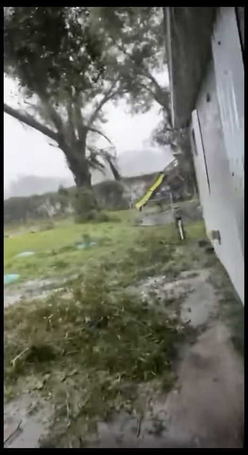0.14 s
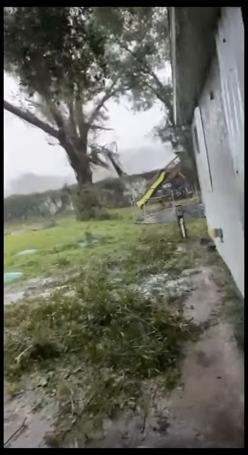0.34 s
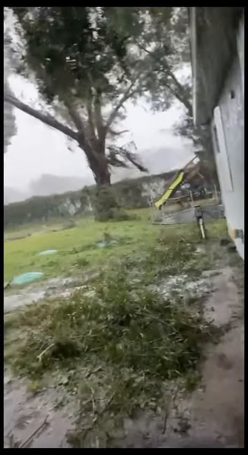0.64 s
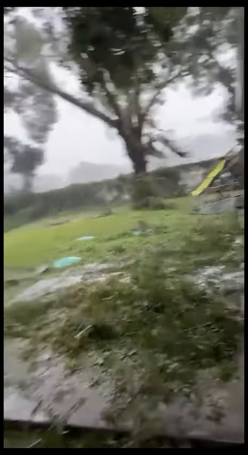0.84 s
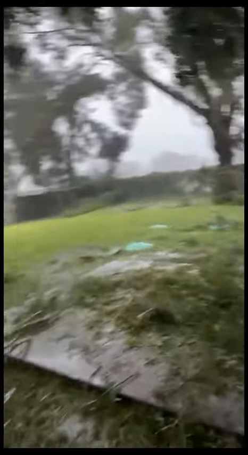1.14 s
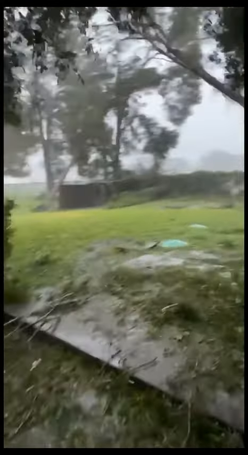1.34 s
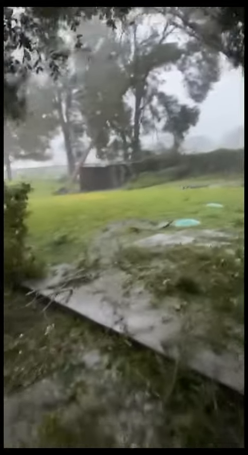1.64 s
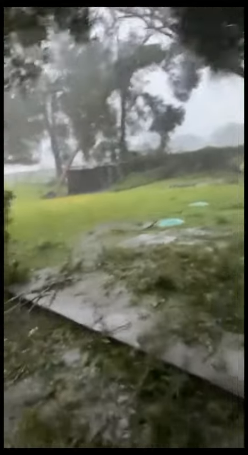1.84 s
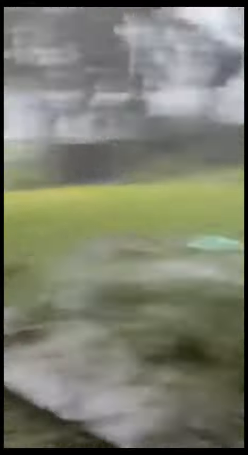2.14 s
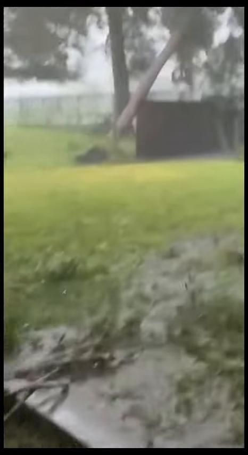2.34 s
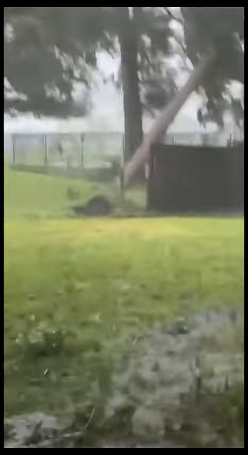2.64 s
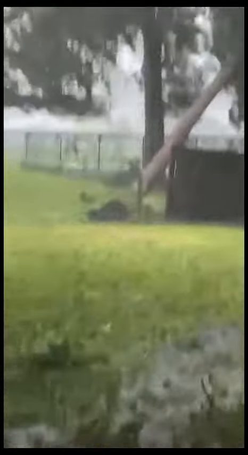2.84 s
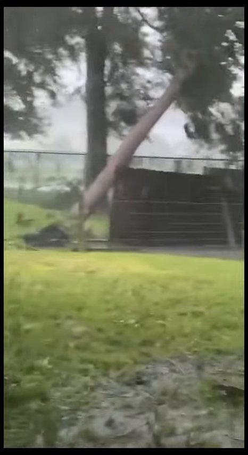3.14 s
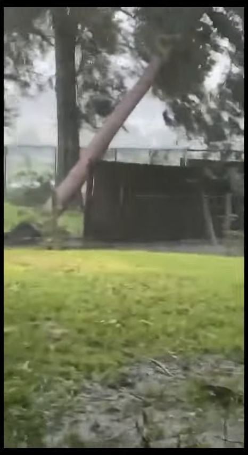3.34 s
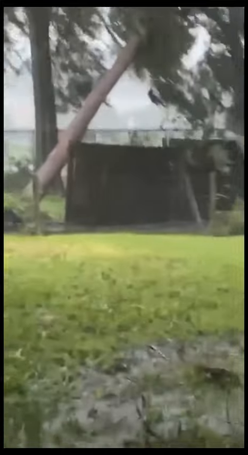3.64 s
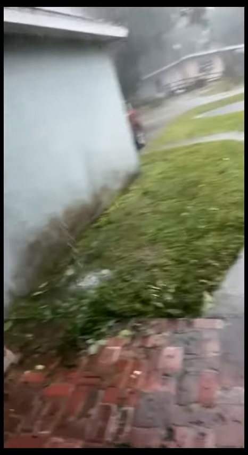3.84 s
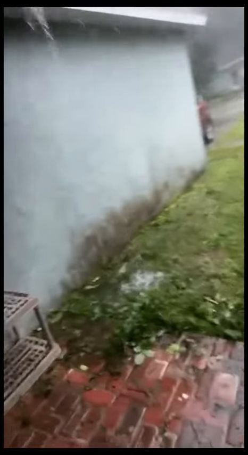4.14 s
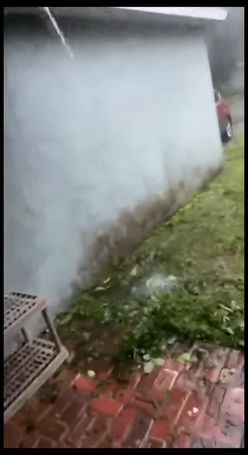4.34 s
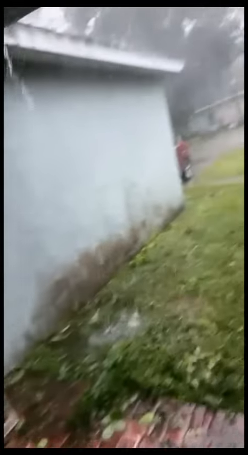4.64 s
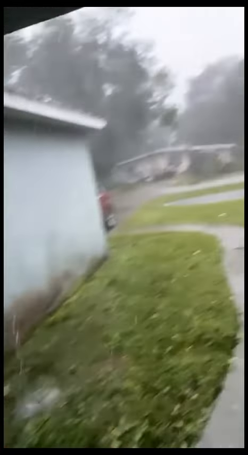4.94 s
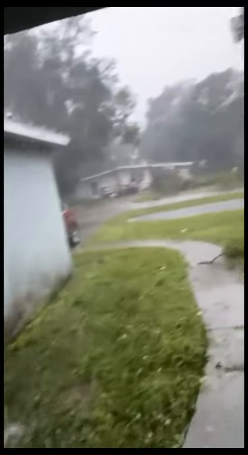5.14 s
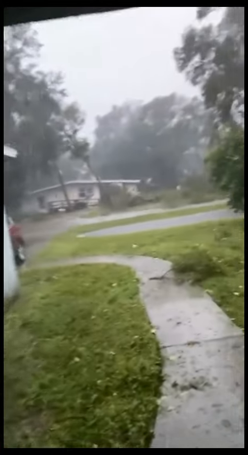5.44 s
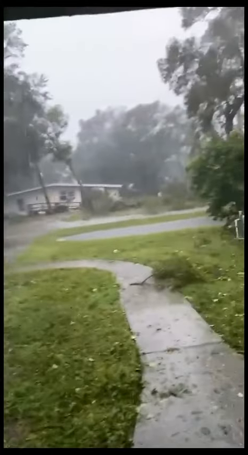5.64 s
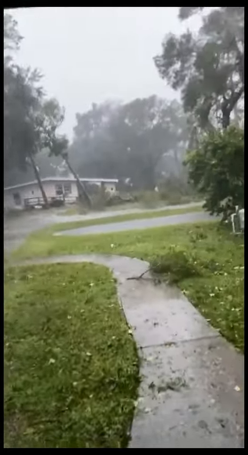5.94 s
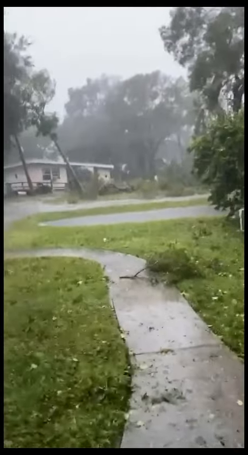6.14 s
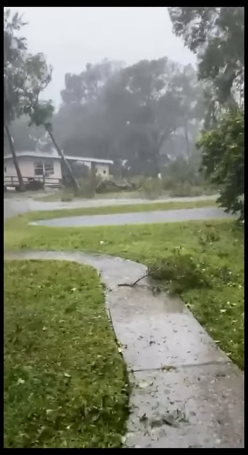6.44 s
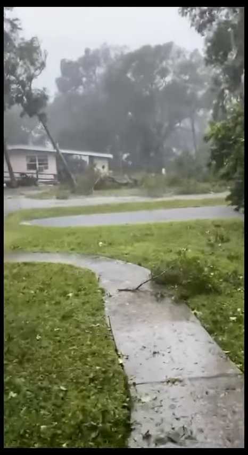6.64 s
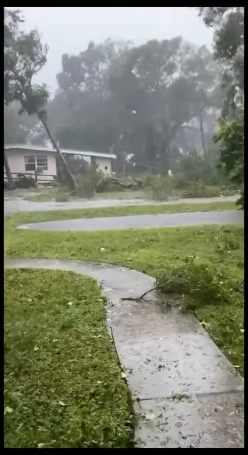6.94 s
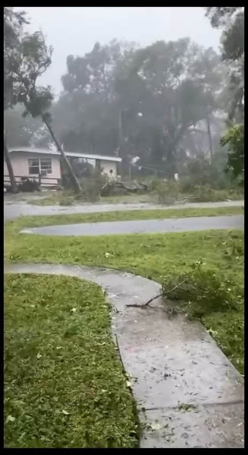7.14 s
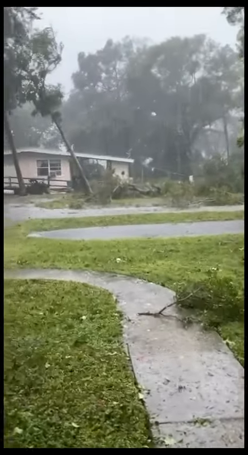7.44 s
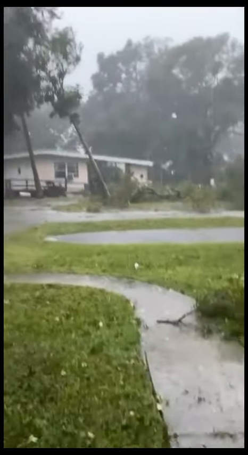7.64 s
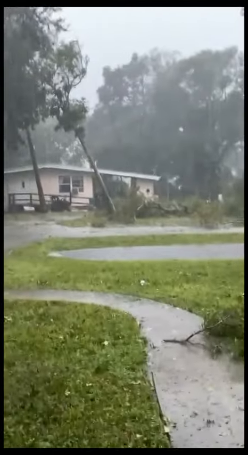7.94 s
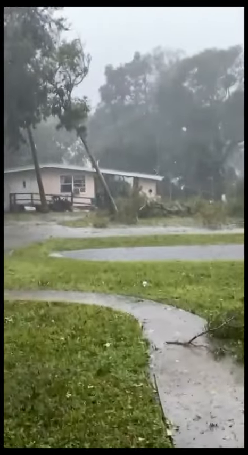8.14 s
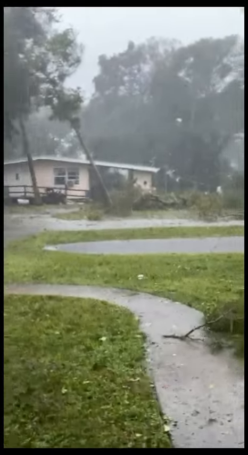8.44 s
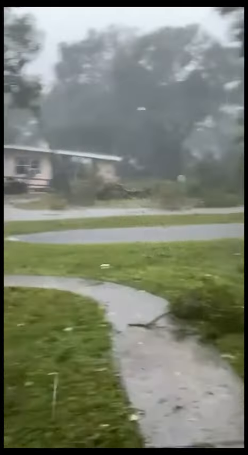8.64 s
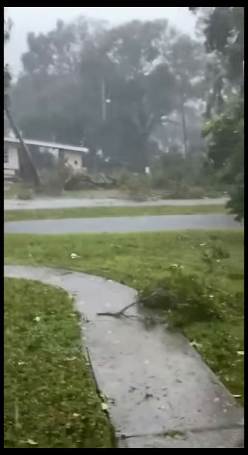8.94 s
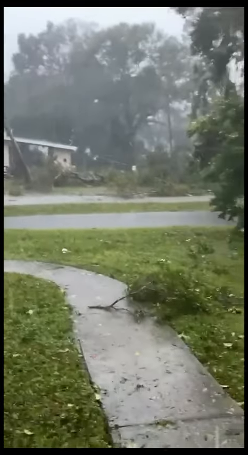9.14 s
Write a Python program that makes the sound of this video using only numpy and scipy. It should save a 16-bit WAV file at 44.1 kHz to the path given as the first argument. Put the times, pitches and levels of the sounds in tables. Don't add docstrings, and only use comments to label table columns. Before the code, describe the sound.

Loud gusty rain with sharp drops and deep wind buffeting cuts to silence, then softer rain swells with wet drips and splats.

```python
import sys
import numpy as np
from scipy import signal
from scipy.io import wavfile
from scipy.ndimage import uniform_filter1d

SR = 44100
rng = np.random.default_rng(int(sys.argv[2]) if len(sys.argv) > 2 else 0)


def ratio_of_db(decibels):
    return 10 ** (np.asarray(decibels, float) / 20)


def bounce(signal):
    frames = np.transpose(np.atleast_2d(signal))
    limited = np.clip(frames, -1, 1)
    pcm = np.round(limited * 32767).astype(np.int16)
    wavfile.write(sys.argv[1], SR, pcm)


N = 409688

# (start [s], end [s])
SILENCE = (3.7205, 4.0425)

# (frequency [Hz], level per Hz [dB])
RAIN_BACK = [(82, -31.5), (140, -1.5), (213, -2), (245, -2), (544, -5.5), (1950, -9), (3030, -13),
             (3770, -11), (5620, -15.5), (8040, -13.5), (12700, -22.5), (14900, -14), (16500, -42)]
# (frequency [Hz], level per Hz [dB])
RAIN_FRONT = [(82, -21), (140, -3.5), (255, -1), (317, 1.5), (523, -5.5), (827, -2), (2330, -6.5),
              (4330, -4.5), (5080, -7.5), (8540, -8.5), (12700, -20.5), (15200, -9), (16500, -46)]
# (time [s], level [dB])
RAIN_LEVEL = [(0.0, -29.5), (0.56, -25.5), (1.15, -27), (1.42, -25), (1.64, -26.5), (2.3, -25.5),
              (2.46, -33), (2.68, -28), (3.1, -29), (3.42, -28), (3.7, -26), (4.04, -45), (4.5, -39),
              (4.95, -35), (5.6, -33), (6.6, -30), (7.9, -26.5), (9.29, -26)]


def rain():
    t = np.arange(N) / SR
    back = t < SILENCE[1]
    hiss = field(by_shot(RAIN_BACK, RAIN_FRONT), 512, patchy_db=1.08, flicker_db=0.39)
    back_gain = ratio_of_db(3.5) / hiss[back].std()
    front_gain = ratio_of_db(2) / hiss[~back].std()
    hiss = hiss * np.where(back, back_gain, front_gain)
    clicks = ratio_of_db(-10.5) * yard(patter(400, 3.2, 2.1, 900, 15200), 0.26)
    splashes = ratio_of_db(-15) * yard(patter(320, 2.0, 1.2, 1500, 11000), 2.6)
    sheets = lumpy(round(0.014 * SR))
    level = ratio_of_db(np.interp(t, *np.transpose(RAIN_LEVEL)) + 0.65 * sheets)
    return level * spray_gain(t) * (0.92 * hiss + np.where(back, clicks, splashes))


def patter(per_s, spread_db, cycles, low_hz, high_hz):
    kinds = 24
    size_db = spread_db * np.minimum(rng.exponential(1, N), 3.5)
    size = ratio_of_db(size_db) * (rng.random(N) < per_s / SR)
    kind = rng.integers(0, kinds, N)
    t = np.arange(600) / SR
    out = np.zeros(N)
    for k, hz in enumerate(np.geomspace(low_hz, high_hz, kinds)):
        grain = np.sin(2 * np.pi * hz * t) * np.exp(-t * hz / cycles)
        grain *= ratio_of_db(read(RAIN_FRONT, hz)) * hz ** 1.56
        out += signal.oaconvolve(size * (kind == k), grain)[:N]
    return evened(out)


# (start [s], hold [s], level against the rain [dB])
SPRAY = [(0.3, 0.027, -11), (1.3, 0.027, -6), (1.41, 0.015, -8), (1.48, 0.02, -5), (2.66, 0.021, -5),
         (2.79, 0.02, -3), (3.46, 0.036, -3.5), (3.63, 0.075, -5), (4.07, 0.017, -8), (4.16, 0.02, -12),
         (4.2, 0.026, -1), (4.37, 0.016, 1), (4.69, 0.054, -4), (4.89, 0.02, -5), (5.33, 0.02, -7),
         (5.545, 0.02, -14), (5.92, 0.025, -0.5), (6.0, 0.037, -0.5), (6.26, 0.018, -2.5), (6.41, 0.02, -9),
         (6.98, 0.03, -8), (8.05, 0.03, -7), (8.94, 0.018, -7), (9.04, 0.027, -5), (9.27, 0.02, -5)]


def spray_gain(t):
    coarse = t[::32]
    spray_db = pushes_db(SPRAY, 1500.5, 297, coarse)
    return np.interp(t, coarse, np.hypot(1, ratio_of_db(spray_db)))


# (time [s], peak level [dB], centre [Hz])
TICKS_BACK = [(0.2952, -5, 8800), (0.3254, -10, 6500), (0.3638, -8, 7830), (0.4565, -16, 7820),
              (0.9674, -1, 7830), (0.9948, -10, 7570), (1.0347, -2.5, 8160), (1.2974, -7, 6500),
              (1.344, -9, 4340), (1.4019, -7, 7680), (1.4638, -16, 3620), (1.59, -11, 3640),
              (1.6433, -11, 7030), (1.8778, -18, 5960), (1.9571, -22, 3840), (2.018, -7, 3970),
              (2.1652, -10, 4170), (2.243, -17, 4650), (2.2729, -10, 4450), (2.3802, -3.5, 8600),
              (2.6501, -10, 6360), (2.669, -11, 4080), (2.7897, -14, 4500), (3.0202, -9, 6120),
              (3.1035, -9, 9750), (3.4507, -9, 4250), (3.4852, -12, 3700), (3.568, -16.5, 8240),
              (3.6318, -9, 5420)]
# (time [s], peak level [dB], centre [Hz])
TICKS_FRONT = [(4.9519, -26, 3200), (5.2856, -22, 6010), (5.3575, -22, 7500), (5.5076, -24, 3280),
               (5.5406, -20, 3940), (5.5889, -22, 3200), (5.6633, -21, 3230), (5.771, -22, 5880),
               (5.8045, -23, 6430), (5.925, -17, 4700), (6.2544, -18, 3800), (6.3984, -15.5, 3450),
               (6.5844, -18.5, 3840), (6.8678, -19, 3500), (6.979, -20, 3450), (7.2404, -20, 4300),
               (7.3916, -24, 5520), (7.5113, -21, 4280), (7.592, -25, 3540), (7.8431, -21, 4800),
               (7.9114, -20, 4260), (8.0426, -17.5, 4500), (8.16, -19, 4300), (8.5135, -16, 4080),
               (8.6062, -15, 4590), (8.6338, -16, 3720), (8.7325, -17, 4050), (9.0104, -22, 3530),
               (9.1536, -26, 4900), (9.2387, -19, 6600)]
# (time [s], peak level [dB], centre [Hz])
SPLATS_BACK = [
    (0.6524, -12, 1990),
    (0.9652, -6.5, 1750),
    (0.9951, -14.5, 2200),
    (1.3438, -9, 1650),
    (1.3957, -7.5, 2230),
    (1.4202, -8, 1530),
]
# (time [s], peak level [dB], centre [Hz])
SPLATS_FRONT = [(4.476, -33, 1950), (4.819, -27, 2320), (4.865, -32, 820), (5.054, -30, 1020),
                (5.097, -26, 1690), (5.317, -22, 1870), (5.376, -26, 2500), (5.543, -20, 1770),
                (5.589, -27, 2030), (5.664, -27, 1750), (5.769, -24, 1740), (6.672, -23, 2610),
                (6.939, -23, 1400), (7.161, -16.5, 2030), (7.33, -20, 1800), (7.69, -20, 1520),
                (7.843, -15, 2480), (7.984, -19, 870), (8.159, -16.5, 2420), (8.287, -20, 2620),
                (8.353, -17, 2640), (8.51, -19, 1820), (8.648, -21.5, 1800), (8.749, -27, 961),
                (9.038, -19, 2050), (9.154, -21, 1100)]
# (time [s], peak level [dB], centre [Hz])
BIG_DROPS = [
    (5.541, -19, 2500),
    (5.542, -19, 7500),
    (5.923, -7.5, 6500),
    (9.03, -10.5, 975),
]
# (time [s], peak level [dB], centre [Hz])
PLINKS = [
    (0.5297, -19, 5300),
    (1.418, -16.5, 440),
    (3.568, -16, 8240),
    (7.32, -18, 2480),
    (7.325, -21, 3600),
    (7.986, -23, 900),
    (9.031, -16.5, 970),
]


def near_drops():
    kinds = [  # rows, splash t60 [s], sharpness = centre / width
        (TICKS_BACK, 0.035, 1.3), (TICKS_FRONT, 0.089, 2.0), (SPLATS_BACK, 0.022, 1.5),
        (SPLATS_FRONT, 0.093, 2.4), (BIG_DROPS, 0.041, 2.2), (PLINKS, 0.046, 5.1)]
    out = np.zeros(N)
    for rows, t60, sharpness in kinds:
        for s, db, hz in rows:
            add(out, s, ratio_of_db(db) * splash(hz, t60, sharpness))
    return yard(out, 0.21)


def splash(hz, t60, sharpness):
    t = np.arange(6000) / SR
    out = 2.2 * t60 * rng.standard_normal(len(t)) * ratio_of_db(-60 * t / t60)
    out[0] = 1
    r = np.exp(-np.pi * hz / sharpness / SR)
    poles = [1, -2 * r * np.cos(2 * np.pi * hz / SR), r * r]
    for zeros in ([1, 0, -1], [1]):
        out = signal.lfilter(zeros, poles, out)
    return out / abs(out).max()


def wind():
    return rumble() + eddies() + slaps()


# (frequency [Hz], level per Hz [dB])
RUMBLE_BACK = [(15, -37.5), (25, -18.5), (48, 3.5), (70, 6.5), (115, 1), (167, -9.5), (220, -12.5),
               (290, -46.5), (480, -120)]
# (frequency [Hz], level per Hz [dB])
RUMBLE_FRONT = [(15, -44.5), (25, -17), (49, 2), (75, 2), (102, 2), (145, -9), (220, -9.5), (290, -37),
                (480, -120)]
# (start [s], hold [s], level [dB])
BUFFETS_BACK = [(0.0, 0.1, -32.5), (0.29, 0.04, -29.5), (0.42, 0.068, -29.5), (1.05, 0.1, -33),
                (1.3, 0.011, -29), (1.45, 0.01, -31), (1.63, 0.0077, -17.5), (1.77, 0.13, -12),
                (1.98, 0.46, -12.5), (2.56, 0.28, -28), (2.6, 0.03, -18), (2.68, 0.01, -20),
                (2.81, 0.01, -14.5), (2.91, 0.03, -21.5), (3.0, 0.075, -26), (3.36, 0.022, -24),
                (3.49, 0.01, -30), (3.66, 0.036, -25.5)]
# (start [s], hold [s], level [dB])
BUFFETS_FRONT = [(4.23, 0.11, -45), (4.37, 0.01, -44), (4.51, 0.02, -40), (4.63, 0.021, -37),
                 (4.8, 0.06, -38), (5.3, 0.01, -46), (5.48, 0.03, -32.5), (5.58, 0.01, -41),
                 (5.75, 0.049, -44), (5.91, 0.14, -33.5), (6.19, 0.02, -44), (6.29, 0.04, -37),
                 (6.58, 0.1, -42), (6.99, 0.67, -34), (7.96, 0.11, -32), (8.6, 0.01, -30),
                 (8.75, 0.02, -27), (8.88, 0.036, -28), (8.98, 0.03, -31), (9.25, 0.009, -24)]


def rumble():
    t = np.arange(N) / SR
    coarse = t[::32]
    noise = evened(field(by_shot(RUMBLE_BACK, RUMBLE_FRONT), 2048, patchy_db=-0.5, flicker_db=0.3))
    noise /= uniform_filter1d(noise ** 2, size=2500) ** 0.24
    buffet_db = pushes_db([*BUFFETS_BACK, *BUFFETS_FRONT], 261, 329.5, coarse)
    breeze_db = np.interp(coarse, *np.transpose(RAIN_LEVEL)) - 6
    push = np.hypot(ratio_of_db(buffet_db), ratio_of_db(breeze_db))
    return noise * ratio_of_db(0.97) * np.interp(t, coarse, push)


# (start [s], hold [s], level [dB])
EDDIES = [(1.419, 0.004, -25), (1.55, 0.2, -34), (1.76, 0.07, -10.5), (1.87, 0.0026, -7),
          (1.956, 0.028, -18.5), (2.036, 0.0045, -2.5), (2.06, 0.036, -10), (2.1, 0.037, -6.5),
          (2.216, 0.003, -7), (2.26, 0.041, -9), (2.3, 0.068, -6), (2.37, 0.061, -7), (2.6, 0.015, -24),
          (2.64, 0.026, -32), (2.73, 0.014, -19.5), (2.77, 0.23, -30)]


def eddies():
    t = np.arange(N) / SR
    coarse = t[::32]
    eddy_db = pushes_db(EDDIES, 898, 598, coarse)

    def band(hz, s):
        speed_db = np.maximum(np.interp(s, coarse, eddy_db), -50)
        top_hz = 393 * ratio_of_db(0.21 * (speed_db + 5))
        slopes = (1 + (hz / top_hz) ** 4.57) * (1 + (110 / (hz + 1)) ** 4)
        return -12.0 * np.log10(slopes) - 8.0 * np.log10(top_hz / 400)

    out = field(band, 512, patchy_db=1.0, flicker_db=1.1) * ratio_of_db(2.4 * lumpy(500))
    out /= np.sqrt(uniform_filter1d(out ** 2, size=1500))
    return out * ratio_of_db(np.interp(t, coarse, eddy_db) - 0.4)


# (time [s], peak level [dB], top [Hz])
SLAPS = [(0.965, 0, 865), (1.418, -12, 590), (1.751, -3, 420), (2.031, 1, 1040), (2.211, -7, 413),
         (2.311, -2, 470), (2.676, -4.5, 114), (2.733, -7, 344), (2.8, -18, 120), (8.583, -19, 120),
         (8.684, -10.5, 112), (8.868, -14, 190), (8.885, -18, 122), (9.241, -18.5, 98)]


def slaps():
    out = np.zeros(N)
    for s, db, top_hz in SLAPS:
        add(out, s, ratio_of_db(db) * slap(top_hz))
    return out


def slap(top_hz):
    turns = 1.345
    t = np.arange(2600) / SR + turns / (3 * top_hz)
    hz = turns / t
    body = 1 / (1 + (hz / top_hz) ** 3)
    body *= hz / (hz + 150) * np.exp(-(t / 0.028) ** 2)
    return np.sin(2 * np.pi * turns * np.log(t / t[0])) * body / body.max()


def yard(x, wet):
    t = np.arange(4000) / SR
    tail = rng.standard_normal(len(t)) * ratio_of_db(-60 * t / 0.076) * (t > 0.002)
    return x + wet * signal.oaconvolve(x, tail / np.linalg.norm(tail))[:N]


def field(shape_db, size, patchy_db, flicker_db):
    hop = size // 4
    t = np.arange(N // hop + 5) * hop / SR
    hz = np.fft.rfftfreq(size, 1 / SR)
    a, b, p, q = rng.standard_normal((len(t), len(hz), 4)).T
    patches = evened(uniform_filter1d(uniform_filter1d(p, size=7, axis=0), size=24, axis=1))
    flicker = evened(uniform_filter1d(uniform_filter1d(q, size=len(hz) // 2, axis=0), size=5, axis=1))
    level_db = shape_db(hz[:, None], t) + patchy_db * patches + flicker_db * flicker
    z = (a + 1j * b) * ratio_of_db(level_db)
    return signal.istft(z, nperseg=size, noverlap=size - hop)[1][:N]


def by_shot(back, front):
    return lambda hz, t: np.where(t < SILENCE[1], read(back, hz), read(front, hz))


def read(points, hz):
    f, value = np.transpose(points)
    return np.interp(np.log(hz + 1), np.log(f + 1), value)


def pushes_db(rows, rise_db_per_s, fall_db_per_s, t):
    power = 1e-8
    for s, hold, db in rows:
        rise = np.maximum(rise_db_per_s * (s - t), 0)
        fall = np.maximum(fall_db_per_s * (t - s - hold), 0)
        power = power + ratio_of_db(2 * (db - rise - fall))
    return 10 * np.log10(power)


def lumpy(width):
    noise = rng.standard_normal(N)
    return evened(uniform_filter1d(uniform_filter1d(noise, width), width))


def evened(x):
    return x / np.sqrt(np.mean(x ** 2) + 1e-20)


def add(mix, s, sound):
    part = mix[round(s * SR):][:len(sound)]
    part += sound[:len(part)]


def scene():
    return (rain() + near_drops() + wind())[None]


def top_cut(x):
    return signal.sosfilt(signal.butter(12, 17000, fs=SR, output="sos"), x)


def record(dry):
    t = np.arange(N) / SR
    stop, start = SILENCE
    held = signal.sosfilt(signal.butter(2, 38, "high", fs=SR, output="sos"), dry)
    held = 0.88 * np.tanh(held / 1.013)
    faint_end = ratio_of_db(-28 - 2600 * np.clip(t - stop, 0, 1))
    faint_end *= np.clip((stop + 0.016 - t) / 0.005, 0, 1)
    fade_in = np.clip((t - start) / 0.014, 0, 1) ** 0.6
    gate = np.where(t < stop, 1, np.maximum(faint_end, fade_in))
    edge = signal.firwin(1023, 15740, window=("kaiser", 10), fs=SR)
    mix = signal.oaconvolve(held * gate, edge[None], "same")
    return top_cut(mix)


dry = scene()
out = record(dry)
bounce(out)
```